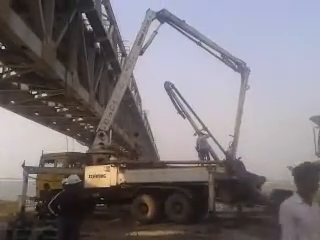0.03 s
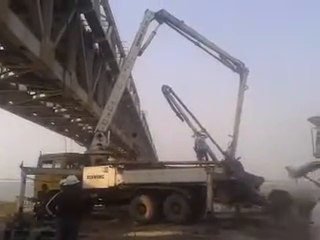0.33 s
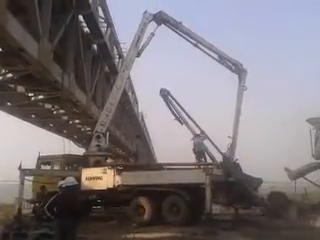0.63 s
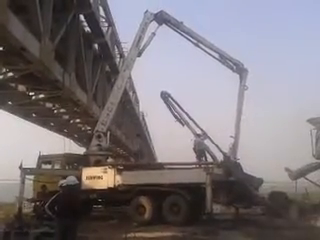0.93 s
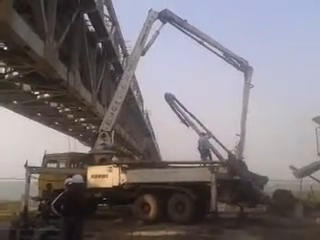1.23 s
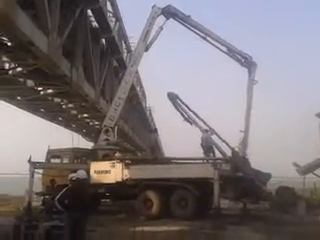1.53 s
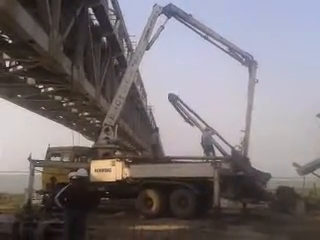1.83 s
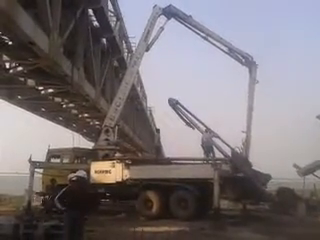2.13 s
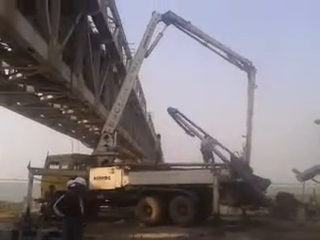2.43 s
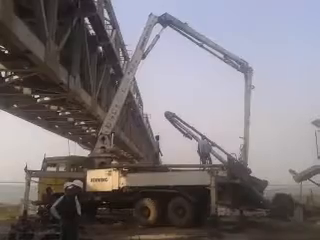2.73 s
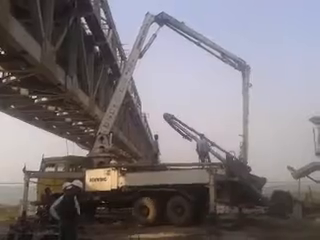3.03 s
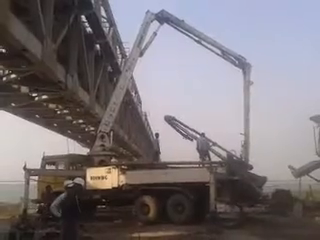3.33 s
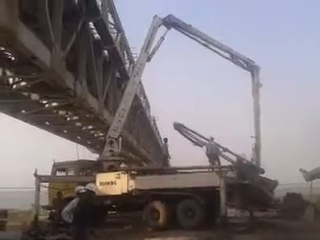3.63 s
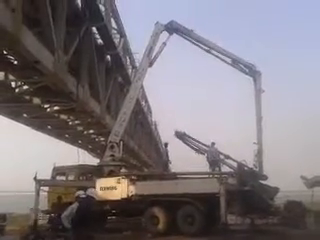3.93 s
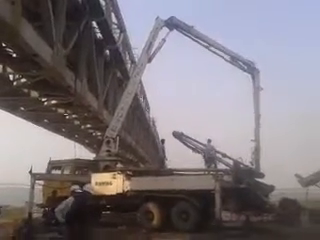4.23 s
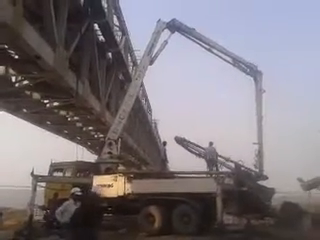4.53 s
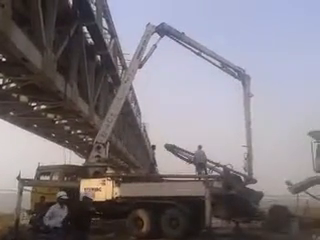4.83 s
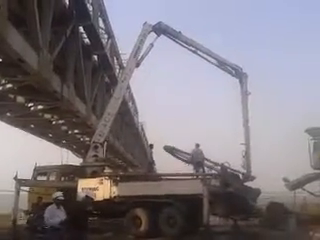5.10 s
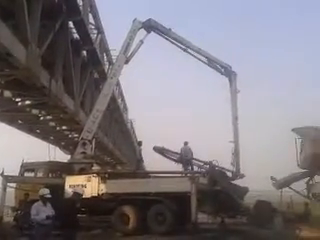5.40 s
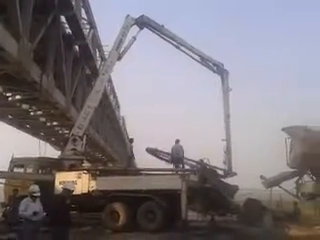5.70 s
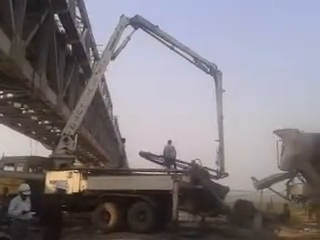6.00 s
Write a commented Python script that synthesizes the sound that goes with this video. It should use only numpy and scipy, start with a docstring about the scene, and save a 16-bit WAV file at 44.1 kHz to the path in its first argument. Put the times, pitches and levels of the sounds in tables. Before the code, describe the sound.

A fierce hiss, like escaping air, overloads the microphone at an outdoor building site. Beneath it a concrete pump truck works, with a steady diesel roar, a throbbing hydraulic hum and a thin gear whine. After about four seconds the hiss dies away. The truck carries on, and gravelly concrete is heard rattling in a steel chute, with a few sharper clatters from bigger stones.

```python
"""A fierce hiss, like escaping air, overloads the microphone and dies away after four seconds.
Beneath it a concrete pump truck works under a steel bridge: the diesel roars at steady speed,
gears whine thinly, and the hydraulic pump's piston pulses hum, sagging once under load.
Once the hiss is gone, gravelly concrete is heard rattling in the steel chute, with a few sharper
clatters from bigger stones."""
import sys
import numpy as np
from scipy import signal
from scipy.fft import rfft, irfft
from scipy.io import wavfile
from scipy.ndimage import uniform_filter1d

SR = 44100
rng = np.random.default_rng(int(sys.argv[2]) if len(sys.argv) > 2 else 0)


def inscribe(sig):
    """Save sig as 16-bit PCM at rate SR to the path in sys.argv[1].

    A 1-D sig is mono; a 2-D sig holds one channel per row.
    Samples are clipped to [-1, 1] before scaling.
    """
    pcm = np.round(np.clip(np.atleast_2d(sig).T, -1, 1) * 32767)
    wavfile.write(sys.argv[1], SR, pcm.astype(np.int16))


N = 267246
TIME = np.arange(N) / SR


def air_hiss(start_db=-6.9, fall_db_per_s=.4, flutter_db=.77, throttle_s=3.96, shut_s=4.42):
    """A turbulent jet with a faint whistle weakens as the pressure drops, then is throttled shut."""
    # The jet's broad resonances. Each row: centre in Hz, width in Hz, relative gain in dB.
    jet_modes = [(2020, 1700, -6), (4192, 1360, 3.5), (9000, 3100, -19.5), (14000, 6500, -25)]
    jet = sum(from_db(db) * resonate(rng.standard_normal(N), hz, width) for hz, width, db in jet_modes)
    whistle = from_db(-25) * noise_band(hz=2203, width_hz=7)
    opening = np.clip((shut_s - TIME) / (shut_s - throttle_s), 0, 1)
    level_db = start_db - fall_db_per_s * TIME + flutter_db * drift(45)
    return np.sqrt(opening) * from_db(level_db) * (rms_one(jet) + whistle)


def diesel(firing_hz=49.91, roar_db=-16, knock_db=.3, gust_db=.3, waver_db=1.3):
    """The roar swells with each firing, and the engine's tones waver in the open air."""
    # Colour of the engine and fan roar. Each row: frequency in Hz, relative density in dB.
    roar_spectrum = [(30, 3), (70, -8), (120, -11.5), (200, -8), (290, -5), (380, 0.3), (500, 1),
                     (750, 0.5), (1200, -1.5), (1800, -4.5), (2600, -6), (4200, -2.5), (8000, -20.5),
                     (15500, -30)]
    # The engine's tones. Each row: multiple of the firing rate, level in dB.
    engine_orders = [(3, -43.5), (4, -49), (7, -40), (8, -42.5), (11.5, -37.5), (14.5, -40.5)]
    phase = phase_of(firing_hz * (1 + .00083 * drift(2.3)))
    swell = from_db(knock_db * np.cos(phase) + gust_db * drift(4))
    roar = from_db(roar_db) * coloured(rng.standard_normal(N) * swell, roar_spectrum)
    tones = sum(from_db(db + waver_db * drift(12)) * np.sin(order * phase + rng.uniform(0, 2 * np.pi))
                for order, db in engine_orders)
    return roar + np.sqrt(2) * tones


def hydraulic_pump(tone_hz=493, sag_hz=13, dip_db=6.5, usual_db=-20, flutter_db=1.5):
    """Piston pulses sing over a throbbing hum; pitch and level sag once as the pump labours."""
    # The pump's partials. Each row: multiple of the main tone, relative level in dB.
    partials = [(.5, -8.5), (1, 0.5), (1.5, -31), (2, -26)]
    # The main tone's slow level ride. Each row: time in seconds, level in dB.
    level_ride = [(0, -23), (1.6, -19.7), (1.85, -23), (2.8, -19.3), (3.35, -22.5), (4.5, -20),
                  (4.85, -17.5), (5.06, -21), (6.06, -19)]
    throb_db, throb_peak_s, throb_period_s = 3.4, .10, .335
    surge_db, first_surge_s, surge_period_s = 2.4, 4.79, .236
    load = gate(1.97, 2.54, attack_s=.17, release_s=.23)
    phase = phase_of((tone_hz - sag_hz * load) * (1 + .002 * drift(30)))
    ride_db = np.interp(TIME, *np.transpose(level_ride))
    throb = throb_db * np.cos(2 * np.pi * (TIME - throb_peak_s) / throb_period_s)
    surge_cycles = (TIME - first_surge_s) / surge_period_s
    surge = surge_db * np.clip(surge_cycles + 1, 0, 1) * np.cos(2 * np.pi * surge_cycles)
    tones = 0
    for multiple, db in partials:
        swing_db = ride_db - usual_db + flutter_db * drift(26)
        # The low hum throbs and follows the ride loosely; the upper partials surge near the end.
        swing_db = .3 * swing_db + throb if multiple < 1 else swing_db + surge
        tones += from_db(usual_db + db + swing_db - dip_db * load) * np.sin(multiple * phase)
    return np.sqrt(2) * tones


def gravel(ticks_per_s=5000, size_db=3, clump_db=2.5):
    """Countless stones tick on the steel chute in clumps, one stream for each resonance."""
    # The chute's resonances. Each row: centre in Hz, width in Hz, relative gain in dB.
    chute_modes = [(5110, 1630, 7.5), (6500, 1460, -5), (9600, 6300, -18)]
    rattle = 0
    for hz, width, db in chute_modes:
        hits = rng.random(N) < ticks_per_s * from_db(clump_db * drift(15)) / SR
        sizes = from_db(size_db * np.minimum(rng.exponential(1, N), 4)) * rng.choice([-1, 1], N)
        rattle += from_db(db) * resonate(hits * sizes, hz, width)
    return pour_flow() * rms_one(rattle)


def pour_flow(rush_db=7, settle_s=.25):
    """Strength of the flow in the chute: each pour rushes in, settles and stops."""
    # Pours of concrete. Each row: start in seconds, end in seconds, settled level in dB.
    pours = [(-.3, 2.0, -22), (2.03, 2.52, -21.5), (3.85, 6.4, -19)]
    flow = 0
    for start, end, db in pours:
        rush = np.exp(-np.maximum(TIME - start, 0) / settle_s)
        flow += from_db(db + rush_db * rush) * gate(start, end, attack_s=.25, release_s=.17)
    return flow


def clatters(attack_s=.0008):
    """Bigger stones skitter on the steel: short bursts, each with its own ring."""
    # Stone hits. Each row: start in seconds, level in dB, centre in Hz, width in Hz, decay in seconds.
    stone_hits = [(4.550, -17, 4500, 3000, .012), (5.122, -18, 6800, 600, .015),
                  (5.250, -14.5, 6450, 800, 0.014), (5.342, -8.5, 4400, 2700, 0.009),
                  (5.395, -17, 4800, 2500, 0.017), (5.449, -13, 5600, 700, 0.011),
                  (5.517, -14.5, 6550, 500, 0.02)]
    out = np.zeros(N)
    for start, db, hz, width, decay in stone_hits:
        age = np.maximum(TIME - start, 0)
        burst = np.minimum(age / attack_s, 1) * np.exp(-age / decay)
        out += from_db(db) * burst * noise_band(hz, width)
    return out


def gears(swell_db=4.5, swell_peak_s=5.3, swell_width_s=.6, waver_db=2.3):
    """The gears' thin, unsteady whine and its octave come forward once near the end."""
    # The whine's tones. Each row: frequency in Hz, resting level in dB.
    whine_tones = [(1100.5, -34), (2202.5, -45)]
    speed = 1 + .0029 * drift(10)
    swell = np.exp(-((TIME - swell_peak_s) / swell_width_s) ** 2)
    whine = sum(from_db(db + swell_db * swell + waver_db * drift(8)) * np.sin(phase_of(hz * speed))
                for hz, db in whine_tones)
    return np.sqrt(2) * whine


def from_db(db):
    """Decibels to gain."""
    return 10 ** (np.asarray(db) / 20)


def rms_one(x):
    """Scale to unit power."""
    return x / np.sqrt(np.mean(x ** 2) + 1e-20)


def phase_of(hz):
    """Running phase, in radians, of a moving pitch."""
    return 2 * np.pi * np.cumsum(hz) / SR


def gate(start, end, attack_s, release_s):
    """Rises from 0 at the start, holds at 1, and is back at 0 by the end."""
    return np.clip(np.minimum((TIME - start) / attack_s, (end - TIME) / release_s), 0, 1)


def drift(rate_hz):
    """Smooth random wander at unit power, rolling off above the given rate."""
    hz = np.arange(N // 2 + 1) * SR / N
    return rms_one(irfft(rfft(rng.standard_normal(N)) / (1 + (hz / rate_hz) ** 2), N))


def coloured(x, spectrum):
    """Shape a sound with an EQ curve of (Hz, dB) points, at unit power."""
    hz, db = np.transpose(spectrum)
    bin_hz = np.maximum(np.arange(N // 2 + 1) * SR / N, 1)
    curve_db = np.interp(np.log(bin_hz), np.log(hz), db)
    return rms_one(irfft(rfft(x) * from_db(curve_db), N))


def resonate(x, hz, width_hz):
    """A resonance applied twice for steep skirts, with unity gain at its peak."""
    radius = np.exp(-np.pi * width_hz / SR)
    gain = (1 - radius ** 2) / 2
    stage = [gain, 0, -gain, 1, -2 * radius * np.cos(2 * np.pi * hz / SR), radius ** 2]
    return signal.sosfilt([stage, stage], x + 1e-18)


def noise_band(hz, width_hz):
    """Noise ringing in one resonance, at unit power."""
    return rms_one(resonate(rng.standard_normal(N), hz, width_hz))


def scene():
    """Truck, hiss and concrete mix to mono, the same in both channels."""
    site = diesel() + gears() + hydraulic_pump() + air_hiss() + gravel() + clatters()
    return np.stack([site, site])


def overload(x, ceiling=.55, hardness=12):
    """The input saturates with a tight knee, spraying the hiss into the treble."""
    return x / (1 + np.abs(x / ceiling) ** hardness) ** (1 / hardness)


def gain_control(x, threshold_db=-13, slope=.31, window_s=.21):
    """Turns the gain down by a share of the excess over the threshold."""
    power = uniform_filter1d(np.mean(x ** 2, axis=0), int(window_s * SR))
    excess_db = np.maximum(10 * np.log10(power + 1e-12) - threshold_db, 0)
    return x * from_db(-slope * excess_db)


def record(dry, bass_cut_hz=185, top_cut_hz=15850, trim_db=-.32):
    """The microphone chain: overload, thinned bass, gain control and a steep top cut."""
    bass_cut = signal.butter(3, bass_cut_hz, "high", fs=SR, output="sos")
    top_cut = signal.ellip(14, .1, 80, top_cut_hz, fs=SR, output="sos")
    thinned = signal.sosfilt(bass_cut, overload(dry))
    return signal.sosfilt(top_cut, from_db(trim_db) * gain_control(thinned))


dry = scene()
out = record(dry)
inscribe(out)
```